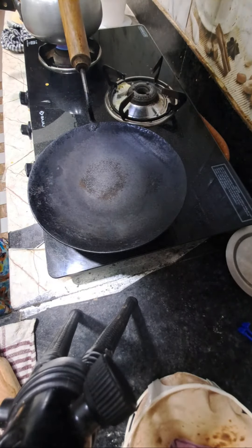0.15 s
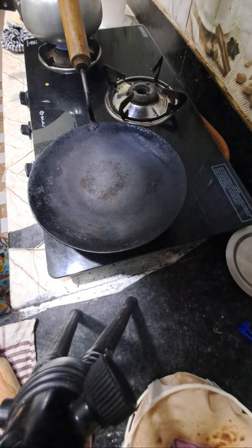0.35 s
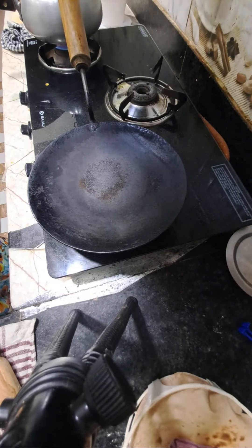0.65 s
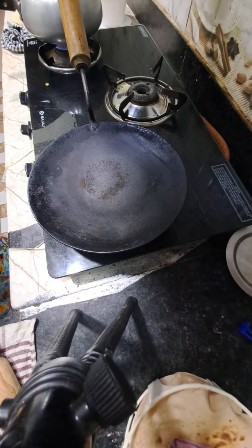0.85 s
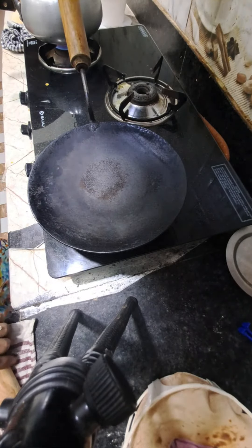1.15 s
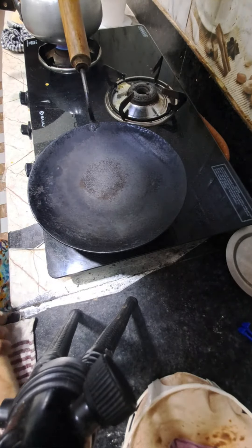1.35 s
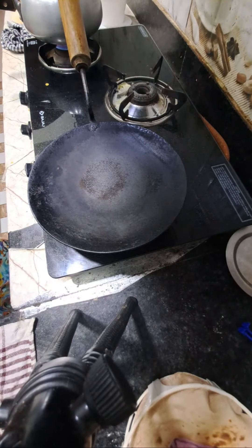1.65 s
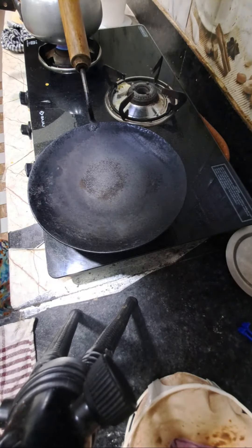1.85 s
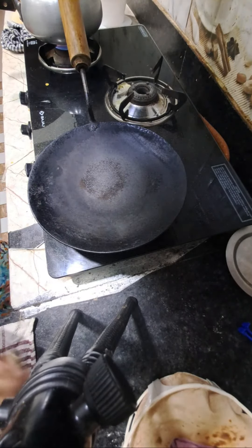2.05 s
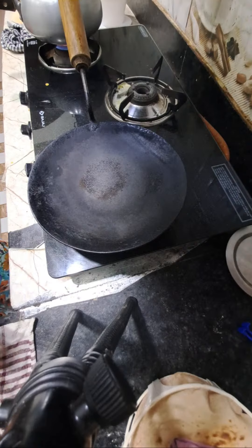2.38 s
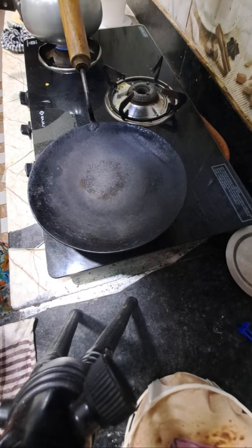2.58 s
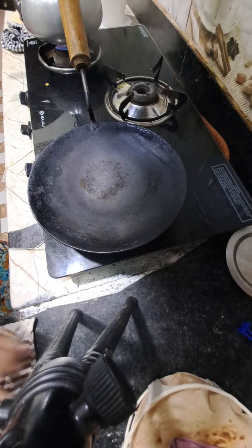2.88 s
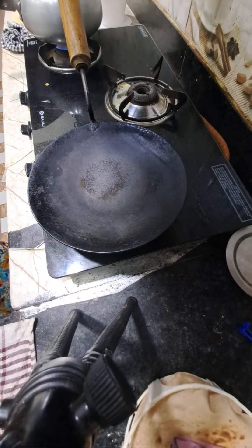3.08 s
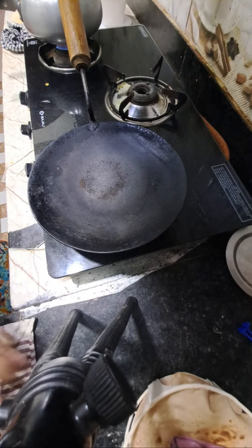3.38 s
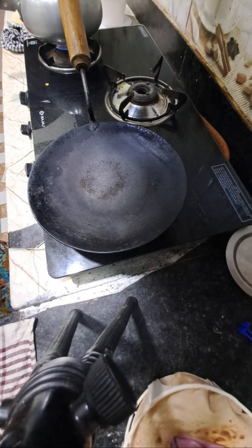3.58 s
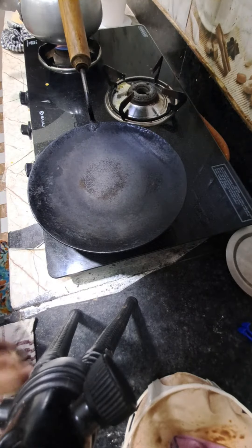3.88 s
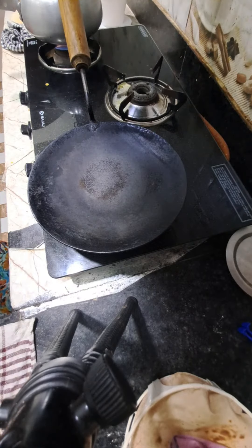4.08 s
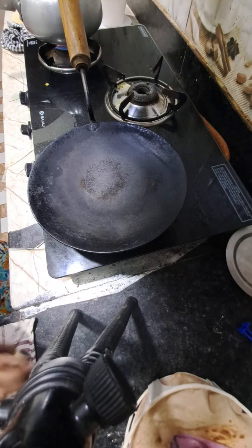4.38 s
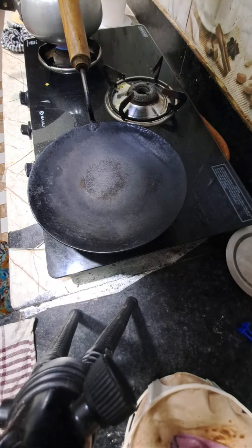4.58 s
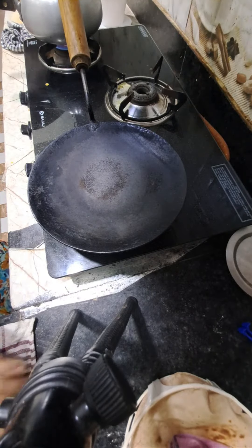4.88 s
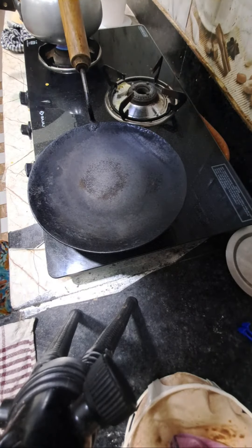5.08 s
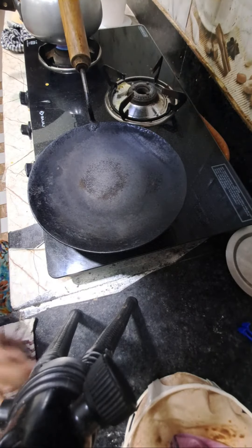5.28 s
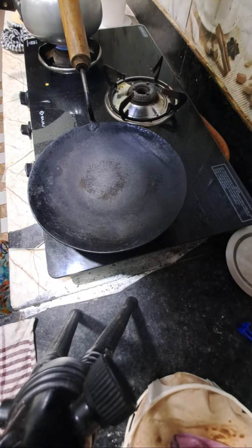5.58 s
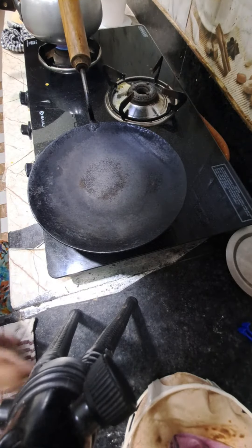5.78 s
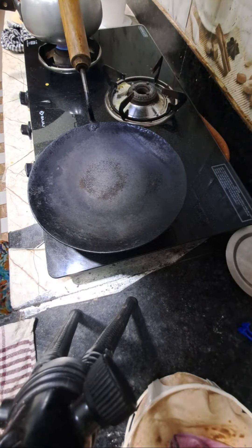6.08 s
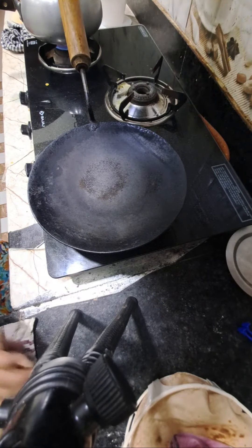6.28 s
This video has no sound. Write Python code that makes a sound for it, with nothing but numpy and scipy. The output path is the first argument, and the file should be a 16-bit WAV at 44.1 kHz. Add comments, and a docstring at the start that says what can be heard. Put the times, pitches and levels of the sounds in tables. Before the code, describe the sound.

A gas burner rumbles low while a pressure cooker spurts, then blasts a bright steam hiss for three seconds before its weight drops back.

```python
"""A small kitchen, a pressure cooker on a gas ring. The burner rumbles; steam leaks and spurts at the valve.
The weight lifts and a bright jet hisses for about 3.3 s, until the weight drops back and rocks.
Steam and flame are shaped noise, the faint hum is a sine, kitchenware blows ring damped modes.
The gain control ducks under the jet and recovers about a second after it."""
import sys
import numpy as np
from scipy import signal
from scipy.fft import rfft, irfft
from scipy.io import wavfile
from scipy.ndimage import uniform_filter1d, minimum_filter1d, map_coordinates

SR = 44100
rng = np.random.default_rng(int(sys.argv[2]) if len(sys.argv) > 2 else 0)


def unload_wav(signal):
    """Save mono or channel-first audio to the path in sys.argv[1] as 16-bit WAV at rate SR, clipped to [-1, 1]."""
    wavfile.write(
        sys.argv[1],
        SR,
        np.round(np.clip(np.atleast_2d(signal).T, -1, 1) * 32767).astype(np.int16),
    )


N = 284445  # samples

# Levels below are ahead of the gain control; flow noise has unit power at 0 dB.
# Burner rumble. Each row: time in seconds, level in dB.
RUMBLE_LEVEL = [(0, -26.5), (1.25, -26), (1.9, -27), (3.1, -27), (4.2, -24.5), (6.45, -24.5)]
# Flame spectrum. Each row: frequency in Hz, relative density in dB.
FLAME_COLOUR = [(20, -23), (42, -29), (54, -22.5), (68, -7.5), (100, 1), (130, -7), (185, -5.5), (225, -20),
                (560, -23), (720, -23.5), (900, -25.5), (2100, -29.5), (3700, -37), (15000, -48.5)]
# Hollows round the burner. Each row: centre in Hz, width at half lift in Hz, lift in dB.
STOVE_RESONANCES = [(99, 10, 3.2), (180, 12, 3.4), (347.2, 23, 9), (473, 59, 6), (636.8, 28, 13.1),
                    (686, 51, 6)]
# Faint hums. Each row: start in seconds, end in seconds, starting pitch in Hz, level in dB.
HUMS = [(5.319, 5.823, 279, -37), (6.25, 6.45, 284, -39)]
HUM_RISE_DB_PER_S, HUM_FADE_DB_PER_S, HUM_SAG_HZ_PER_S = 150, 46, 8.3

# Blows on a utensil, steel bowl, valve weight, pot and counter.
# Each row: time in seconds, strength in dB before the object's trim.
UTENSIL_BLOWS = [(.2046, -19), (.2058, -5)]
BOWL_BLOWS = [(1.256, -16.5)]
WEIGHT_BLOWS = [(5.110, -11.5)]
POT_BLOWS = [(1.695, -10)]
COUNTER_BLOWS = [(1.258, -26), (2.780, -12.5), (2.785, -11), (4.228, -14), (5.1755, -4), (5.181, -7),
                 (5.202, -11.5), (6.143, -18)]
# Ringing modes of the same objects. Each row: frequency in Hz, level in dB, 60 dB decay time in seconds.
UTENSIL_MODES = [(1600, -17.5, 0.014), (1970, -15.5, 0.015), (2390, -1, 0.014), (2570, -9, 0.012),
                 (2830, -14, 0.018), (3400, -23, 0.013), (5150, -16.5, 0.0087)]
BOWL_MODES = [(358, -21, 0.077), (540, 0, 0.038), (905, -6, 0.068), (1326, -0.5, 0.11), (1450, -19, 0.057),
              (2110, -2, 0.048), (2250, -19.5, .07)]
WEIGHT_MODES = [(715, -2, .035), (970, 1.5, .02), (1190, -2, 0.015), (1570, 0, 0.045)]
POT_MODES = [(474, -21, 0.023), (715, 3.5, 0.069), (793, -9.5, 0.045), (1400, -12, .04), (1610, -9, 0.028)]
COUNTER_MODES = [(137, 0.5, .16), (200, -11, .06), (300, 1, 0.036), (466, 0.5, 0.022), (734, -2.5, 0.026),
                 (834, -6.5, 0.014)]

# Leak under the seated weight: grows with the pressure until the weight starts to rock.
# The fade acts on top of the rise.
LEAK_START_DB, LEAK_RISE_DB_PER_S = -30.5, 3
LEAK_ENDS_S, LEAK_FADE_DB_PER_S = 1.12, 71.5
# Spurts, one per rock of the weight. Each row: time in seconds, peak in dB.
SPURTS = [(1.08, -32), (1.28, -22.5), (1.505, -21), (1.65, -11), (5.46, -45), (5.71, -40.5), (5.96, -44),
          (6.21, -41), (6.46, -46)]
# Splutters of the rush around the opening and before the shutting. Each row: time in seconds, peak in dB.
SPLUTTERS = [(1.56, -38), (1.64, -28), (1.78, -20.5), (4.53, -13.5), (4.66, -15.5), (5.0, -11)]
SPURT_SIGMA_S, SPLUTTER_SIGMA_S = 0.041, 0.023  # of the power bell
# Jet fully open between these times: the weight lifts, then drops.
OPEN_S, OPENING_DB_PER_S = 1.767, 119
SHUT_S, SHUTTING_DB_PER_S = 5.072, 182
# Hiss of the open jet. Each row: time in seconds, level in dB.
JET_HISS_LEVEL = [(1.75, 4), (2.1, 4.5), (2.85, 2.5), (3.55, 4), (4.4, 4), (4.74, 6), (5.07, 3)]
# Lower rush of the open jet. Each row: time in seconds, level in dB.
JET_RUSH_LEVEL = [(1.75, -25), (1.97, -26), (2.5, -23.5), (2.62, -17.5), (3.4, -18), (4.4, -16),
                  (4.55, -12.5), (5.07, -15.5)]
# Hiss and rush spectra. Each row: frequency in Hz, relative density in dB.
HISS_COLOUR = [(200, -58), (1000, -32), (3000, -17.5), (5000, -13.5), (6200, -13.5), (7000, -12),
               (7900, -7), (8200, -4), (9600, -3.5), (10500, -4), (11800, -0.5), (12200, 0.3),
               (14000, -0.5), (15700, -1.5)]
RUSH_COLOUR = [(150, -39), (500, -23), (1000, -12), (1600, -6.5), (2400, -3), (3300, -1.5), (4000, 2.5),
               (5200, -4.5), (6500, -8.5), (9000, -20.5)]
# Edge tones of the valve gap. Each row: centre in Hz, bandwidth in Hz, level in dB re the gap noise.
VALVE_TONES = [(6950, 250, -21.5), (7460, 39, -23), (8430, 130, -26), (9590, 110, -23), (10230, 100, -16.5),
               (10490, 72, -22), (10970, 69, -18.5), (11240, 110, -23.5), (11660, 180, -21),
               (11800, 90, -18)]

AGC_THRESHOLD_DB, AGC_RANGE_DB = -19.5, 20
AGC_WINDOW_S, AGC_SMOOTHING_S = 0.08, 0.087
AGC_HOLD_S, AGC_RELEASE_DB_PER_S = 1.006, 51
CUTOFF_HZ = 15800


def from_db(db):
    """Decibels to gain."""
    return 10 ** (np.asarray(db) / 20)


def unit_power(x):
    """Scale to unit mean power."""
    return x / np.sqrt(np.mean(x ** 2) + 1e-20)


def in_time(rows):
    """Interpolate a (time, value) table at every sample."""
    return np.interp(np.arange(N) / SR, *np.transpose(rows))


def gate_db(start_s, end_s, rise_db_per_s, fall_db_per_s):
    """Envelope in dB: rises to 0 at the start, holds, falls from the end."""
    t_s = np.arange(N) / SR
    before_db = rise_db_per_s * np.maximum(start_s - t_s, 0)
    after_db = fall_db_per_s * np.maximum(t_s - end_s, 0)
    return -before_db - after_db


def puffs(rows, sigma_s):
    """Amplitude of bell-shaped puffs, summed in power."""
    t_s = np.arange(N) / SR
    power = np.zeros(N)
    for time_s, peak_db in rows:
        power += from_db(peak_db) ** 2 * np.exp(-0.5 * ((t_s - time_s) / sigma_s) ** 2)
    return np.sqrt(power)


def drift(rate_hz):
    """Slow random curve of unit power: noise rolled off above rate_hz."""
    hz = np.arange(N // 2 + 1) * SR / N
    spectrum = rfft(rng.standard_normal(N)) / (1 + (hz / rate_hz) ** 2)
    return unit_power(irfft(spectrum, N))


def turbulence(colour, resonances=()):
    """Flow noise of unit power: a broad colour, lifted at the resonances it passes through."""
    hz = np.maximum(np.arange(N // 2 + 1) * SR / N, 1)
    points_hz, points_db = np.transpose(colour)
    level_db = np.interp(np.log(hz), np.log(points_hz), points_db)
    for centre_hz, width_hz, lift_db in resonances:
        level_db = level_db + lift_db / (1 + (2 * (hz - centre_hz) / width_hz) ** 2)
    spectrum = rfft(rng.standard_normal(N)) * from_db(level_db)
    return unit_power(irfft(spectrum, N))


def ring(force, hz, t60_s):
    """Two-pole resonator: a unit click starts a decaying sine of about unit height."""
    radius = from_db(-60 / (t60_s * SR))
    angle = 2 * np.pi * hz / SR
    poles = [1, -2 * radius * np.cos(angle), radius ** 2]
    return signal.lfilter([0, np.sin(angle)], poles, force + 1e-18)  # offset avoids denormals


def burner(flicker_db):
    """The flame's uneven roar resounds under the pot: coloured noise with a flickering level."""
    roar = turbulence(FLAME_COLOUR, STOVE_RESONANCES)
    return roar * from_db(in_time(RUMBLE_LEVEL) + flicker_db * drift(16))


def hum(waver_db):
    """Thin tone after the jet: a sine of sagging pitch and wavering level."""
    t_s = np.arange(N) / SR
    out = np.zeros(N)
    for start_s, end_s, hz, db in HUMS:
        pitch_hz = hz - HUM_SAG_HZ_PER_S * (t_s - start_s)
        level_db = db + gate_db(start_s, end_s, HUM_RISE_DB_PER_S, HUM_FADE_DB_PER_S)
        tone = np.sqrt(2) * np.sin(2 * np.pi * np.cumsum(pitch_hz) / SR)
        out += tone * from_db(level_db)
    return out * from_db(waver_db * drift(7))


def struck(blows, modes, trim_db, contact_hz):
    """Each blow rings all modes; soft contact dulls it, a small body radiates no deep bass."""
    clicks = np.zeros(N)
    for time_s, strength_db in blows:
        clicks[round(time_s * SR)] = from_db(strength_db + trim_db)
    band = signal.butter(3, [90, contact_hz], "band", fs=SR, output="sos")
    force = signal.sosfilt(band, clicks + 1e-18)
    return sum(from_db(db) * ring(force, hz, t60_s) for hz, db, t60_s in modes)


def kitchen_walls(x, wet_db, t60_s):
    """Direct sound plus a dense, dying wash of wall reflections."""
    t_s = np.arange(SR // 2) / SR
    tail = rng.standard_normal(len(t_s)) * from_db(-60 * t_s / t60_s)
    tail *= t_s > 0.004  # gap before the first reflection
    wash = signal.fftconvolve(x, tail / np.linalg.norm(tail))[:N]
    return x + from_db(wet_db) * wash


def kitchenware():
    """Utensil click, steel clink, pot clunk, valve weight seating and counter thuds, as damped modes."""
    blows = (struck(UTENSIL_BLOWS, UTENSIL_MODES, trim_db=-1.5, contact_hz=5600)
             + struck(BOWL_BLOWS, BOWL_MODES, trim_db=-4.5, contact_hz=4000)
             + struck(POT_BLOWS, POT_MODES, trim_db=-3.0, contact_hz=2490)
             + struck(WEIGHT_BLOWS, WEIGHT_MODES, trim_db=-1.0, contact_hz=2500)
             + struck(COUNTER_BLOWS, COUNTER_MODES, trim_db=-3, contact_hz=1000))
    return kitchen_walls(blows, wet_db=-4, t60_s=0.18)


def near_echoes(x, echo_db, longest_s, sway_s, dull_hz, count=6):
    """Lid, hob and wall throw the jet back; paths sway with the hot plume, so the comb shimmers."""
    dulling = signal.butter(8, dull_hz, fs=SR, output="sos")
    reflected = signal.sosfilt(dulling, x)
    out = x
    for lag_s in rng.uniform(0.2, 1, count) * longest_s:
        read_at = np.arange(N) - SR * (lag_s + sway_s * drift(6))
        echo = map_coordinates(reflected, [read_at], order=3, mode="wrap")
        out = out + from_db(echo_db) * echo
    return unit_power(out)


def whistles(wander_db):
    """Breathy edge tones of the valve gap, noise-driven; each waxes and wanes as the weight shifts."""
    out = np.zeros(N)
    for hz, width_hz, db in VALVE_TONES:
        t60_s = np.log(1000) / (np.pi * width_hz)
        tone = unit_power(ring(rng.standard_normal(N), hz, t60_s))
        out += tone * from_db(db + wander_db * drift(2.0))
    return out


def valve_flow(leak_rush_db):
    """Hiss and rush amplitudes: spurts only hiss, splutters only rush, leak and jet do both."""
    leak_db = LEAK_START_DB + LEAK_RISE_DB_PER_S * np.arange(N) / SR
    leak_db = leak_db + gate_db(0, LEAK_ENDS_S, 0, LEAK_FADE_DB_PER_S)
    seated_hiss = np.hypot(from_db(leak_db), puffs(SPURTS, SPURT_SIGMA_S))
    lift_db = gate_db(OPEN_S, SHUT_S, OPENING_DB_PER_S, SHUTTING_DB_PER_S)
    jet_hiss = from_db(in_time(JET_HISS_LEVEL) + lift_db)
    jet_rush = from_db(in_time(JET_RUSH_LEVEL) + lift_db)
    open_rush = np.hypot(jet_rush, puffs(SPLUTTERS, SPLUTTER_SIGMA_S))
    leak_rush = from_db(leak_db + leak_rush_db)
    return np.hypot(seated_hiss, jet_hiss), np.hypot(leak_rush, open_rush)


def steam(flutter_db, rush_flutter_db):
    """The narrow gap hisses; the wider plume of the lifted weight adds a lower rush; both flutter together."""
    flutter = drift(33)
    gap = turbulence(HISS_COLOUR) + whistles(wander_db=3.0)
    hiss = near_echoes(gap, echo_db=-12.5, longest_s=0.008, sway_s=6e-5, dull_hz=11940)
    rush = turbulence(RUSH_COLOUR)
    hiss_level, rush_level = valve_flow(leak_rush_db=-16.5)
    fluttering_hiss = hiss * hiss_level * from_db(flutter_db * flutter)
    fluttering_rush = rush * rush_level * from_db(rush_flutter_db * flutter)
    return fluttering_hiss + fluttering_rush


def gain_control(x):
    """Loud sound turns the gain down within its range; the cut is held, then released, and smoothed."""
    power = uniform_filter1d(np.mean(x ** 2, axis=0), int(AGC_WINDOW_S * SR))
    level_db = 10 * np.log10(np.maximum(power, 1e-12))
    over_db = np.clip(level_db - AGC_THRESHOLD_DB, 0, AGC_RANGE_DB)
    # running maximum over the past hold time
    hold = int(AGC_HOLD_S * SR)
    held_db = -minimum_filter1d(-over_db, hold, origin=(hold - 1) // 2, mode="nearest")
    # the cut shrinks no faster than the release rate
    climb_db = AGC_RELEASE_DB_PER_S * np.arange(N) / SR
    cut_db = np.maximum.accumulate(held_db + climb_db) - climb_db
    r = np.exp(-1 / (AGC_SMOOTHING_S * SR))
    return x * from_db(-signal.lfilter([1 - r], [1, -r], cut_db))


def scene():
    """Steam, flame, hum and kitchenware, alike in both channels."""
    jet = steam(flutter_db=0.5, rush_flutter_db=1.1)
    mono = jet + burner(flicker_db=1.3) + hum(waver_db=2.3) + kitchenware()
    return np.array([mono, mono])


def record(dry):
    """The small microphone loses the deepest bass, the gain control rides the level, the top is cut steeply."""
    bass_cut = signal.butter(4, 48, "high", fs=SR, output="sos")
    top_cut = signal.ellip(12, 0.1, 90, CUTOFF_HZ, fs=SR, output="sos")
    levelled = gain_control(signal.sosfilt(bass_cut, dry))
    return signal.sosfilt(top_cut, levelled)


dry = scene()
out = record(dry)
unload_wav(out)
```